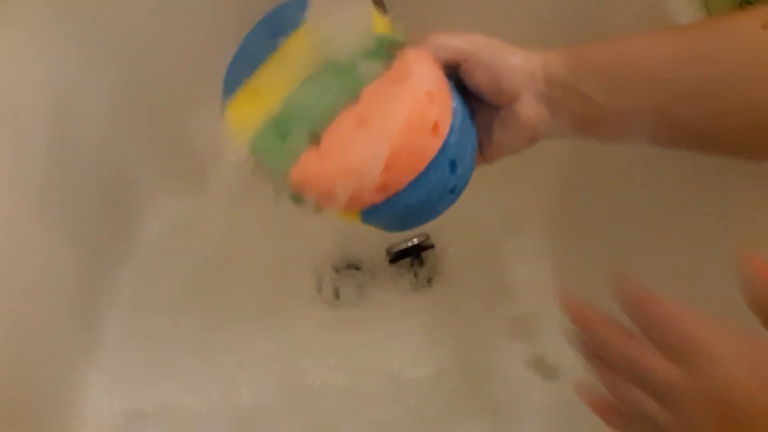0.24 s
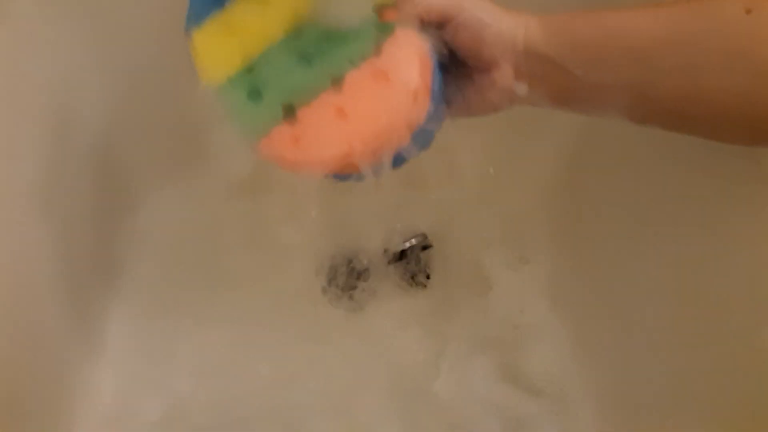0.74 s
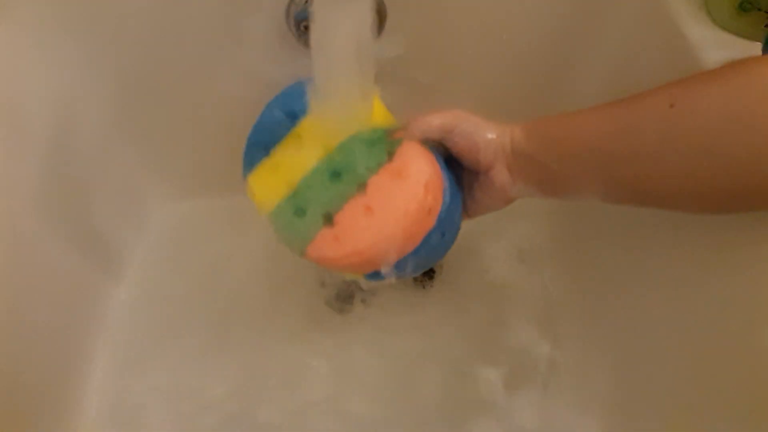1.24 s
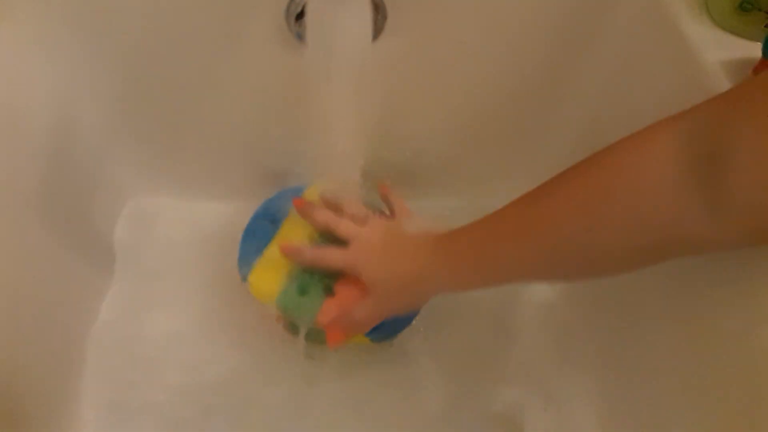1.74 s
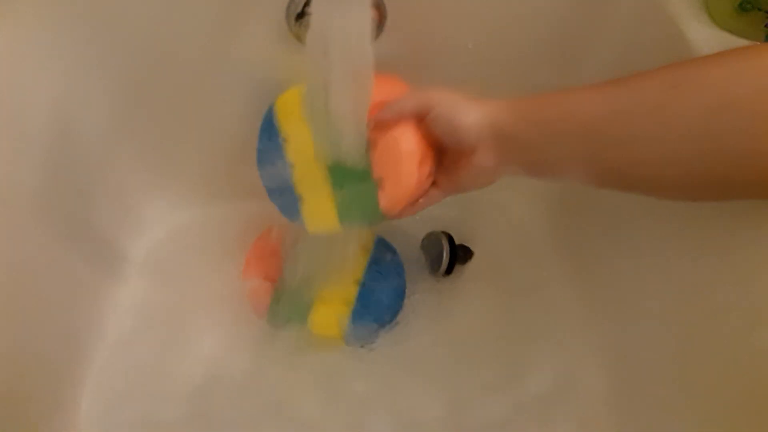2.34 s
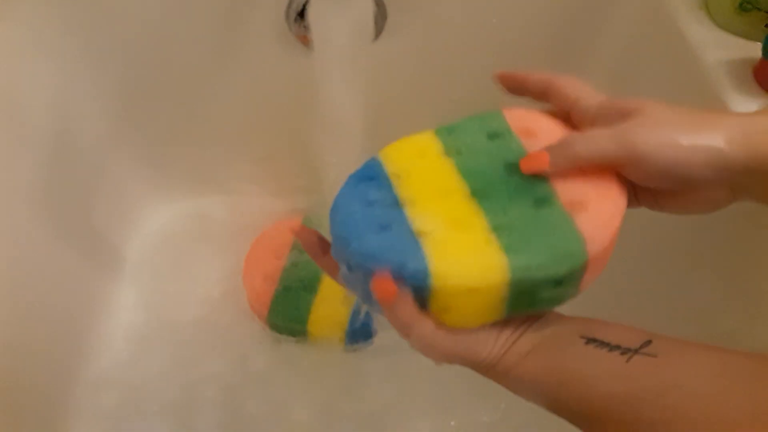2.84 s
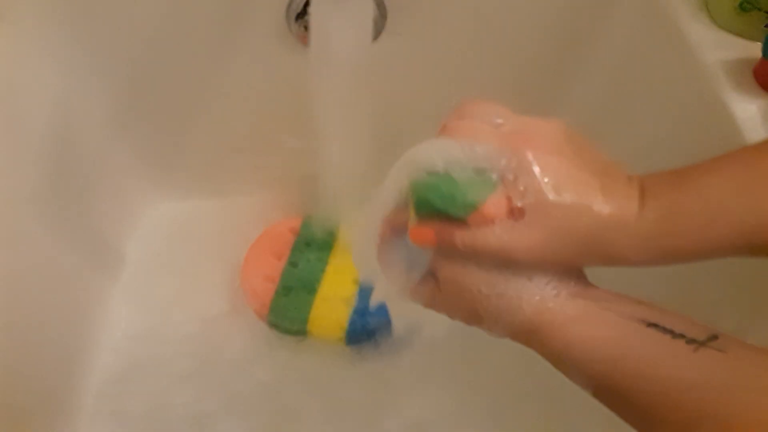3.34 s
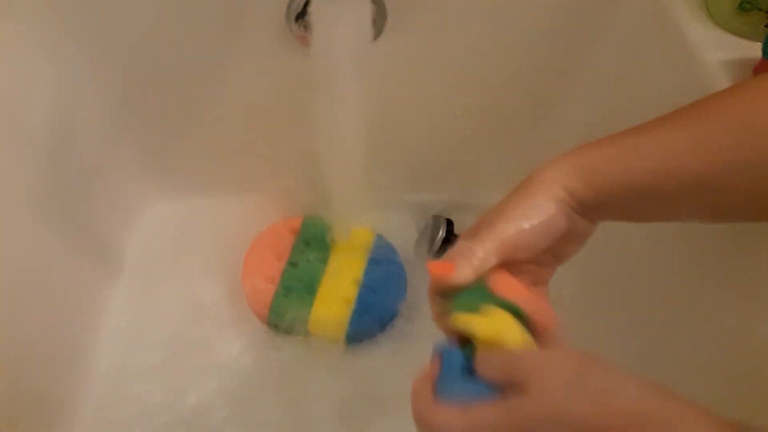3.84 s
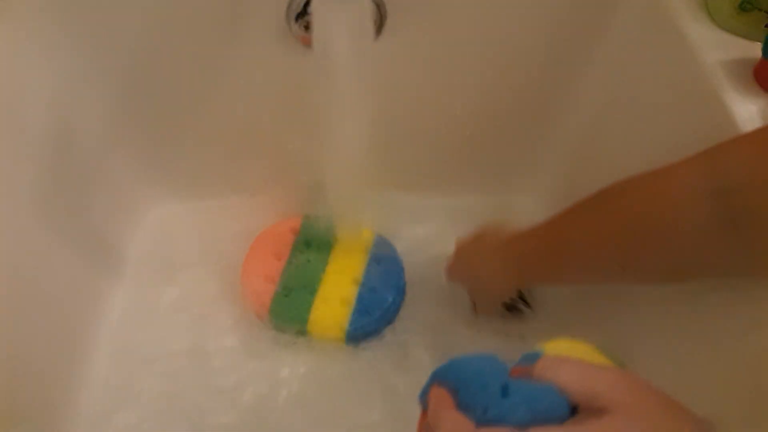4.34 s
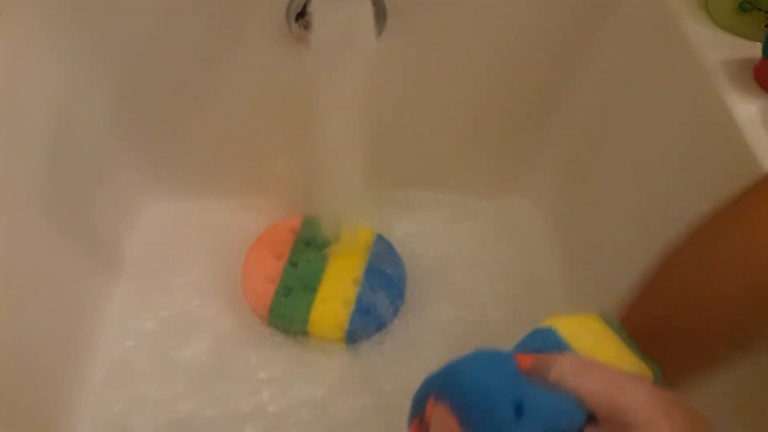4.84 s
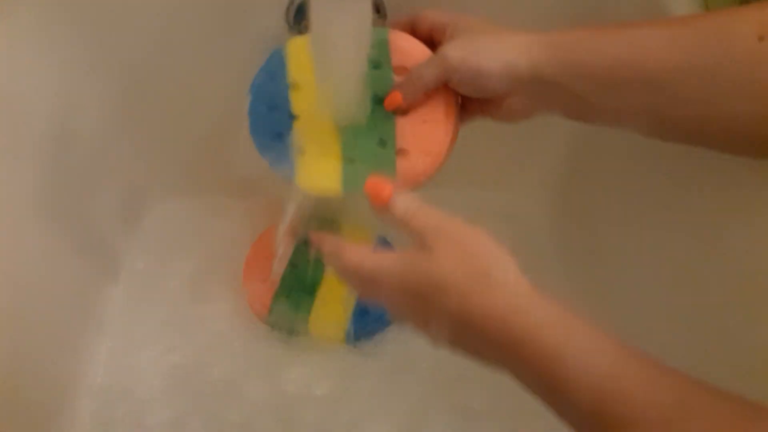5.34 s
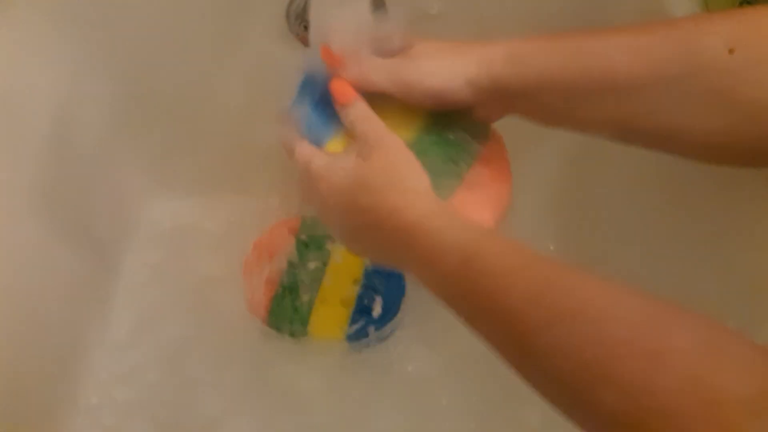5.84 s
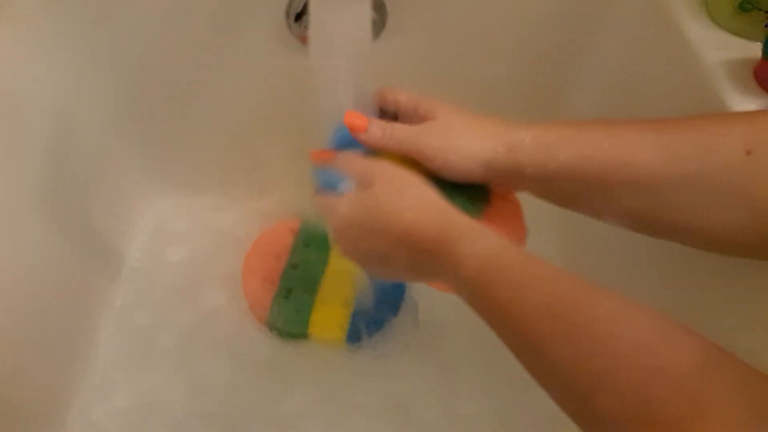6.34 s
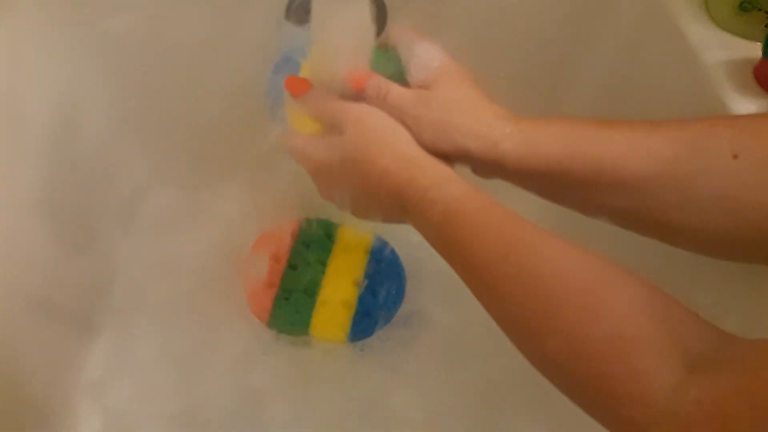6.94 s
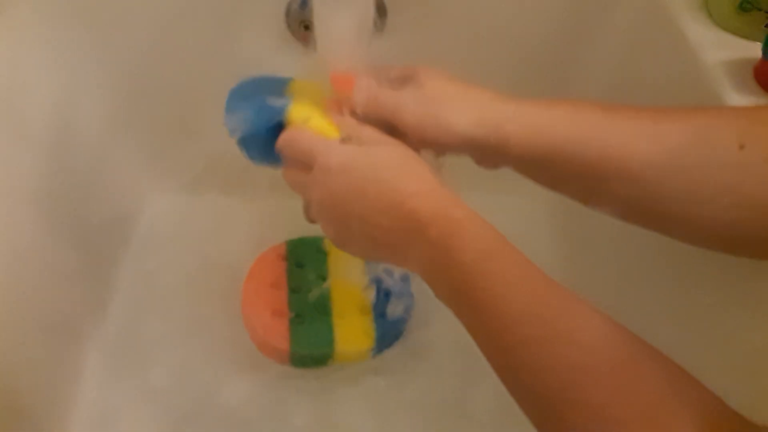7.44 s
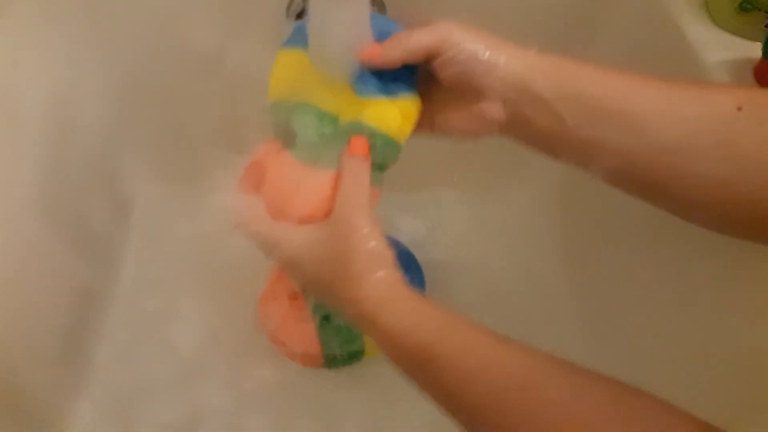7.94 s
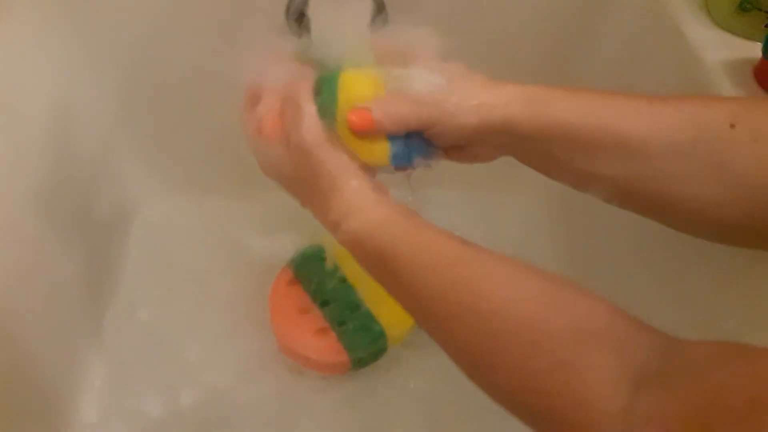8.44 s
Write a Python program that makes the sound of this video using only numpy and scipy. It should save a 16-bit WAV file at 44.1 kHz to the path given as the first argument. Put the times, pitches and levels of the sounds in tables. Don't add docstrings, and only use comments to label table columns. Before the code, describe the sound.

A bath tap runs hard into a hollow, drumming tub while hands rinse sponges; splashes, gulping bubbles and one bouncing knock midway.

```python
import sys
import numpy as np
from scipy import signal
from scipy.fft import rfft, irfft, next_fast_len
from scipy.io import wavfile
from scipy.ndimage import uniform_filter1d, map_coordinates

SR = 44100
rng = np.random.default_rng(int(sys.argv[2]) if len(sys.argv) > 2 else 0)


def linear_from_db(decibels):
    return 10 ** (np.asarray(decibels, float) / 20)


def file_out(sig):
    cols = np.atleast_2d(sig).T
    lim = np.clip(cols, -1, 1)
    pcm = np.round(lim * 32767).astype(np.int16)
    wavfile.write(sys.argv[1], SR, pcm)


N = 383669


def unit(x):
    return x / np.sqrt(np.mean(x ** 2) + 1e-20)


def along(points, hz):
    f, v = np.transpose(points)
    return np.interp(np.log(hz + 1), np.log(f + 1), v)


def wobble(rate_hz):
    knots = rng.standard_normal(int(N * rate_hz / SR) + 4)
    return map_coordinates(knots, [np.arange(N) * rate_hz / SR])


def swell(s, rise_s, hold_s, fall_s):
    corners = np.cumsum([s, abs(rise_s), abs(hold_s), abs(fall_s)])
    return np.interp(np.arange(N) / SR, corners, [0, 1, 1, 0])


def filtered(x, response):
    m = next_fast_len(N + 8192)
    return irfft(rfft(x, m) * response(np.fft.rfftfreq(m, 1 / SR)), m)[..., :N]


def modal(modes, hz):
    peaks = sum(linear_from_db(2 * db) / (1 + (2 * (hz - centre) / width) ** 2) for centre, width, db in modes)
    return np.sqrt(1 + peaks)


def patchy(patchy_db, lead=0.):
    z = signal.stft(rng.standard_normal((2, N)), nperseg=512)[2]
    z[1] = np.cos(lead) * z[1] + 1j * np.sin(lead) * z[0]
    field = uniform_filter1d(rng.standard_normal(z.shape[1:]), size=5, axis=0)
    field = uniform_filter1d(field, size=5, axis=1)
    return signal.istft(z * linear_from_db(patchy_db * unit(field)), nperseg=512)[1][:, :N]


def ports(pair):
    mid, side = pair
    return np.array([mid + side, mid - side]) / np.std(mid)


def grains(s, db, hz, pan_db, cycles, rise, size):
    turn = hz[:, None] * np.arange(size) / SR
    envelope = (1 - np.exp(-3 * turn)) * np.exp(-turn / cycles)
    wave = envelope * np.sin(2 * np.pi * turn * (1 + rise * turn / cycles))
    out = np.zeros((2, N))
    for port, sign in enumerate((1, -1)):
        start = np.round(s * SR - sign * pan_db).astype(int)
        at = np.clip(start[:, None] + np.arange(size), 0, N)
        heard = linear_from_db(db + sign * pan_db / 2)[:, None] * wave
        out[port] = np.bincount(at.ravel(), heard.ravel(), N + 1)[:N]
    return out


def shower(count, hz, spread, uneven_db, cycles, rise, size):
    u = rng.random(count)
    g = np.clip(rng.standard_normal((count, 3)), -2, 2)
    pitch = np.clip(hz * np.exp(spread * g[:, 0]), 100, 16000)
    cloud = grains(u * N / SR, uneven_db * g[:, 2], pitch, 3 * g[:, 1], cycles, rise, size)
    return unit(filtered(cloud, lambda f: 1 / (1 + (hz / (4 * f + 1)) ** 4)))


def spurts(count, t60, uneven_db):
    u = rng.random(count)
    g = np.clip(rng.standard_normal(count), -2, 2)
    kicks = np.bincount((u * N).astype(int), linear_from_db(2 * uneven_db * g), N)
    power = signal.lfilter([1], [1, -linear_from_db(-120 / (t60 * SR))], kicks)
    return power / power.mean()


# t/s, level/dB
CHURN = [(0.0, 1.5), (0.4, 0), (1.2, 1), (2.0, 0.5), (2.8, 0), (3.4, 0.5), (4.2, -1), (4.8, 0.5),
         (6.3, 0.5), (7.1, .5), (7.8, 1), (8.2, 0), (8.7, 1.5)]


def churn():
    s, db = np.transpose(CHURN)
    return np.interp(np.arange(N) / SR, s, db)


# start t/s, spray level/dB, share falling freely [0-1]
HANDS = [(0.0, -31.5, .1), (0.7, -32, 0.3), (0.9, -29.5, 0), (1.44, -35, 0), (1.52, -26.5, 0),
         (2.27, -30, .2), (2.4, -27.5, 0), (2.7, -32, 0), (2.84, -24, 0.84), (4.92, -23, .9),
         (5.37, -34, 0.6), (5.56, -31.5, 0.4), (6.19, -25, 0.4), (6.61, -31, 0.7), (7.6, -34, 0),
         (7.74, -30, 0.45), (8.5, -31.5, 0.4)]


def spell(column, smooth_s):
    starts = [row[0] for row in HANDS]
    now = np.searchsorted(starts, np.arange(N) / SR, side="right") - 1
    held = np.array(HANDS)[np.clip(now, 0, None), column]
    return uniform_filter1d(held, size=max(1, round(smooth_s * SR)), mode="nearest")


# f/Hz, width/Hz, level over the base/dB
TUB_MODES = [(110, 18, 17.6), (148, 12, 9.3), (235, 8, 10.9), (265, 11, 20), (310, 16, 17), (430, 33, 13.1),
             (508, 15, 11.4), (540, 11, 14.0), (592, 61, 11.6), (691, 24, 12.1), (787, 31, 9.3),
             (866, 29, 13.9), (1000, 31, 5.5), (1090, 13, 17.0), (1195, 39, 18.0), (1252, 16, 17.1),
             (1311, 26, 10.5), (1370, 26, 8.2), (1406, 14, 10.4), (1467, 16, 4.7), (1534, 14, 1.7),
             (1674, 25, -0.6), (1896, 31, 4.8), (3335, 38, 9.5), (3447, 16, 0.9), (3760, 90, 6)]
# f/Hz, width/Hz, level over the base/dB
TUB_SIDE_MODES = [(278, 12, 12), (299, 5.6, 15), (332, 15, 9), (376, 10, 5), (461, 19, 8.5), (734, 15, 3),
                  (851, 52, 3), (1000, 54, 9.5), (1076, 14, 14), (1178, 37, 19), (1246, 21, 16),
                  (1470, 17, 0), (3331, 69, 1), (3791, 120, 2)]
# f/Hz, level per Hz/dB
TUB_BASE = [(20, -18), (50, -16), (62, -8), (90, -12), (125, -33), (150, 1.5), (350, -2.5), (750, -5),
            (1150, 6), (1400, -1), (1600, 0), (2000, -2), (2600, -35)]
# f/Hz, level per Hz/dB
TUB_SIDE_BASE = [(20, -56), (60, -42), (90, -35), (125, -34), (160, -16.5), (350, -5), (750, -2),
                 (1150, -2), (1400, 3.5), (1600, 3.5), (2000, -6), (2600, -40)]


def tub():
    churn_db = churn()
    free = spell(column=2, smooth_s=0.18)
    drum_db = -31.5 + 1.6 * churn_db - 0.5 * free
    sing_db = -27.5 + 0.53 * churn_db
    boom_db = -64.5 + 13 * free

    def shape(modes, hz):
        base = linear_from_db([along(TUB_BASE, hz), along(TUB_SIDE_BASE, hz)])
        return base * [modal(modes, hz), modal(TUB_SIDE_MODES, hz)]

    def high(hz):
        return 1 / (1 + (980 / (hz + 1)) ** 24)

    drum = ports(filtered(patchy(patchy_db=1.1, lead=-.35),
                          lambda hz: shape(TUB_MODES[1:], hz) * np.sqrt(1 - high(hz))))
    bubbles = shower(count=900, hz=700, spread=.4, uneven_db=5, cycles=3.5, rise=.04, size=1200)
    sing = ports(filtered(patchy(patchy_db=1.7, lead=0.47),
                          lambda hz: shape(TUB_MODES, hz) * np.sqrt(high(hz))))
    boom = unit(filtered(rng.standard_normal(N), lambda hz: modal(TUB_MODES[:1], hz) ** 2 - 1))
    drum = linear_from_db(drum_db + 0.35 * wobble(12)) * (drum + linear_from_db(-10) * bubbles)
    sing = linear_from_db(sing_db + 0.56 * wobble(30) + [[.6], [-.8]]) * sing
    return drum + sing + linear_from_db(boom_db) * boom


# f/Hz, level per Hz/dB
NOZZLE_HISS = [(1000, -39.5), (1400, -19.5), (1900, -4.5), (2600, -2.5), (3400, 0.5), (4000, -2.5),
               (4300, 0), (4600, -2), (5100, -4.5), (6300, -5.5), (6900, -5.5), (12000, -25), (16000, -13)]
# f/Hz, side over mid level/dB
NOZZLE_SIDE = [(1400, 1), (2200, -2.5), (3400, -3), (4000, 1), (9000, 0)]
# f/Hz, width/Hz, level/dB
NOZZLE_MODES = [(3654, 31, 3), (3880, 41, 2.5), (4670, 55, 5), (6280, 22, 6.5), (6300, 500, -1.5)]


def gush():
    def colour(hz):
        nozzle = linear_from_db(along(NOZZLE_HISS, hz)) * modal(NOZZLE_MODES, hz)
        side = modal(TUB_SIDE_MODES, hz) * linear_from_db(along(NOZZLE_SIDE, hz))
        return nozzle * [modal(TUB_MODES, hz), side]

    hiss = ports(filtered(patchy(patchy_db=2.34, lead=-.28), colour))
    bubbles = shower(count=1800, hz=2506, spread=0.332, uneven_db=4.0, cycles=9.6, rise=0.023, size=560)
    return linear_from_db(-27 + churn() + 0.89 * wobble(35)) * (hiss + linear_from_db(-9.0) * bubbles)


# f/Hz, level per Hz/dB
SPRAY_COLOUR = [(1200, -54), (2400, -23), (3400, -2), (5000, -0.5), (6600, 4.5), (7800, -8.5), (12000, -6),
                (14000, -12.5), (16000, -19.5)]
# t/s, peak level/dB, f/Hz
DROPS = [(1.3593, -9, 4560), (1.524, -7, 3760), (1.8257, -6, 4620), (2.069, -4, 6090), (2.09, -1.5, 3720),
         (2.831, -4, 6500), (2.9961, -5, 5920), (3.1736, -8, 6660), (3.358, -4, 6510), (3.4171, -14, 6660),
         (3.4545, -10, 4230), (3.5838, -5, 5940), (3.6571, -1.5, 6030), (3.7549, -5, 5650),
         (3.8786, -18, 6520), (3.93, -3, 4400), (4.097, -3, 6800), (4.4298, -9, 3710), (4.559, -7, 6370),
         (4.6905, -3, 6610), (4.8097, -5, 3060), (4.9733, -2, 3970), (5.046, -1, 4340), (5.8304, -2, 6300),
         (6.578, -6, 3970), (8.3705, -3.5, 5930), (8.6817, -9, 5200)]
# t/s, level over the spray/dB, length/s
THROWN = [(0.547, 3.5, .12), (1.555, 2, 0.062), (1.642, 4, 0.044), (1.817, 1, 0.036), (1.965, 0.5, .08),
          (2.167, 3.5, 0.06), (3.28, -0.5, .04), (3.36, 0, .04), (4.346, 0, 0.033), (4.55, 0.5, .04),
          (4.836, 1.5, 0.039), (5.102, 1.5, 0.068), (5.315, 1.5, 0.046), (5.584, 5, 0.037),
          (7.114, 5, 0.045), (7.377, 4.5, .07), (8.242, 2.5, .06), (8.67, 0, .04)]


def spray():
    def colour(hz):
        return linear_from_db(along(SPRAY_COLOUR, hz))

    hiss = 0
    for band in ([(6500, -1.5), (8500, 0.45)], [(6500, -5.0), (8500, 0.5)]):
        short = spurts(count=1100, t60=0.033, uneven_db=7.0)
        long = spurts(count=300, t60=0.25, uneven_db=-4.5)
        bursts = np.sqrt(0.2 + 0.37 * short + 0.45 * long)
        hiss = hiss + filtered(bursts * patchy(patchy_db=2.3), lambda hz: colour(hz) * linear_from_db(along(band, hz)))
    crackle = shower(count=9000, hz=7900, spread=0.455, uneven_db=3.5, cycles=3.4, rise=0.03, size=90)
    pings = shower(count=3500, hz=6954, spread=0.45, uneven_db=5.5, cycles=21.0, rise=0.011, size=380)
    ticks = shower(count=1200, hz=11000, spread=0.31, uneven_db=5.5, cycles=5, rise=.01, size=90)
    steady = unit(hiss) + linear_from_db(-8) * crackle + linear_from_db(-7.0) * pings + linear_from_db(-13) * ticks

    s, db, hz = np.transpose(DROPS)
    pan_db = 2 * np.clip(rng.standard_normal(len(s)), -2, 2)
    drops = grains(s, db - 6, hz, pan_db, cycles=5, rise=.02, size=500)
    hits = np.bincount(np.round(s * SR).astype(int), linear_from_db(db - 10.5), N)
    puffs = signal.lfilter([1], [1, -linear_from_db(-60 / (.03 * SR))], hits)
    puffs = puffs * unit(filtered(rng.standard_normal((2, N)), colour))

    level_db = spell(column=1, smooth_s=0.03)
    level_db = level_db + sum(db * swell(s, 0.005, length_s, 0.025) for s, db, length_s in THROWN)
    return linear_from_db(level_db + 1.84 + 0.68 * wobble(22)) * steady + drops + puffs


# t/s, peak level/dB, f/Hz, left-right level/dB
AIR_POCKETS = [
    (0.083, -12.5, 820, 0),
    (0.308, -18, 850, 1),
    (0.51, -17, 795, -2),
    (1.53, -18, 323, -0.5),
    (1.558, -13, 980, -1),
    (6.039, -35, 425, -11),
    (7.439, -14, 510, 1),
    (8.594, -11, 905, 4),
]
# t/s, peak level/dB, f/Hz, left-right level/dB
SPONGE_BUBBLES = [
    (0.0894, -30, 1890, -1.0),
    (5.6094, -24, 2120, 2),
    (6.0726, -19, 2050, -2),
    (6.099, -14.5, 2130, 3),
    (6.1294, -22, 1990, 3),
    (6.8758, -19, 1880, -3),
    (7.2609, -23, 2180, -1),
]


def gulps():
    s, db, hz, pan_db = np.transpose(AIR_POCKETS)
    large = grains(s, db - 2.5, hz, pan_db, cycles=3.5, rise=.03, size=2000)
    s, db, hz, pan_db = np.transpose(SPONGE_BUBBLES)
    return large + grains(s, db + 1.0, hz, pan_db, cycles=11, rise=0.0063, size=1500)


# t/s, thud level/dB, clack level/dB
BLOWS = [
    (4.8012, -30, -17),
    (4.8085, -19, -10.5),
    (4.8125, -26, -15),
    (4.8175, -21, -14),
    (4.835, -29, -26),
    (4.864, -23, -20),
    (4.872, -21, -29),
]
# f/Hz, level/dB, t60/s
THUD_MODES = [(180, -9, .08), (330, -6, .06), (480, -6, .04), (690, 0, .035), (900, -6, .035)]
# f/Hz, level/dB, t60/s
CLACK_MODES = [(1700, -14, .015), (2200, -13, .015), (2750, -6, .012), (3050, 0, .015), (3600, 1, .009),
               (4700, -4, .008)]


def knocks():
    out = np.zeros(N)
    t = np.arange(SR // 8) / SR

    def ring(modes):
        return sum(linear_from_db(db + rng.normal(0, 1.0) - 60 * t / t60) * np.sin(2 * np.pi * hz * t)
                   for hz, db, t60 in modes)

    for s, thud_db, clack_db in BLOWS:
        blow = linear_from_db(thud_db + 7) * ring(THUD_MODES) + linear_from_db(clack_db + 7) * ring(CLACK_MODES)
        out[round(s * SR):][:len(t)] += np.clip(t / .0014, 0, 1) ** 2 * blow
    return out * linear_from_db([[-.6], [.6]])


# f/Hz, t60/s
ROOM_DECAY = [(300, 0.12), (2000, 1), (10000, 0.047)]


def room(x):
    hz, t, z = signal.stft(rng.standard_normal((2, SR // 2)), SR, nperseg=256)
    decay = linear_from_db(-60 * t / along(ROOM_DECAY, hz)[:, None])
    tail = signal.istft(z * decay, SR, nperseg=256)[1]
    late = np.pad(x, ((0, 0), (150, 0)))
    return signal.fftconvolve(late, tail / np.linalg.norm(tail[0]), axes=1)[:, :N]


def scene():
    events = knocks() + gulps()
    return tub() + gush() + spray() + events + linear_from_db(-9) * room(events)


def roll_off(x):
    return signal.sosfilt(signal.butter(12, 16780, fs=SR, output="sos"), x)


def record(dry):
    gain = linear_from_db(-3 * swell(4.86, rise_s=0.097, hold_s=0.85, fall_s=1))
    mix = filtered(dry * gain, lambda hz: (hz < 15760) / np.sqrt(1 + (15 / (hz + 1)) ** 2))
    return roll_off(mix)


dry = scene()
out = record(dry)
file_out(out)
```